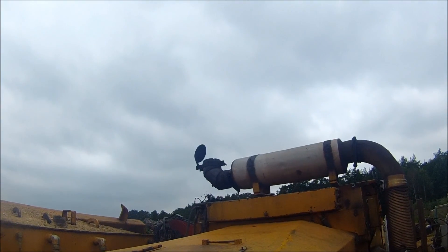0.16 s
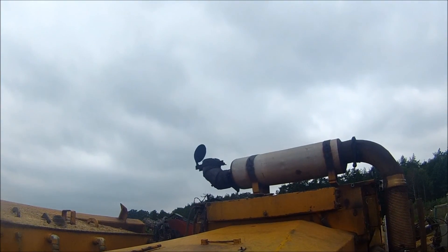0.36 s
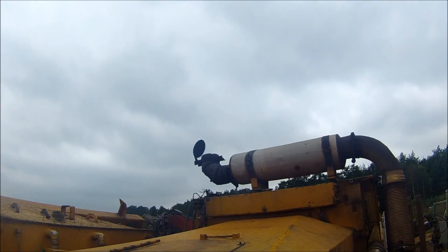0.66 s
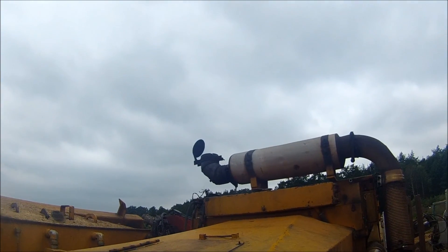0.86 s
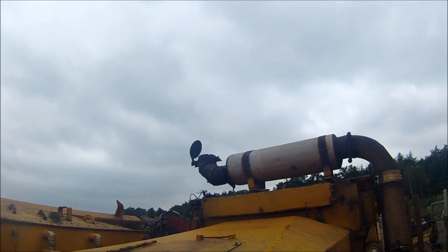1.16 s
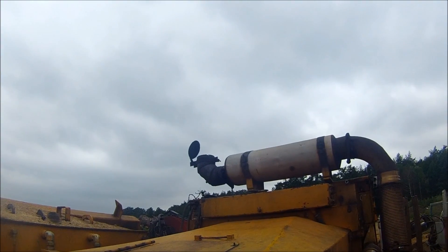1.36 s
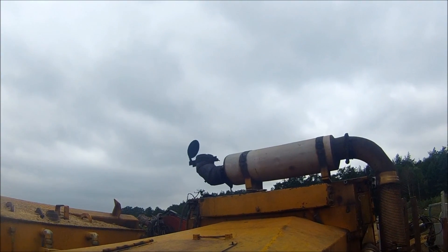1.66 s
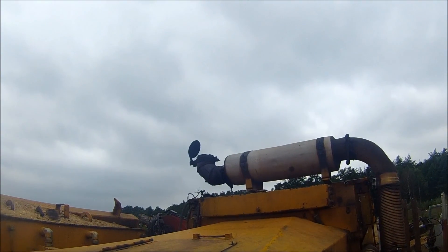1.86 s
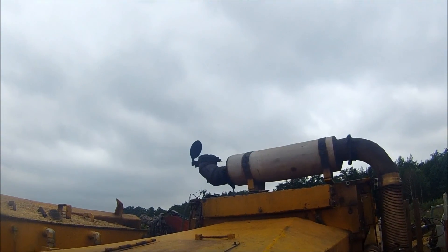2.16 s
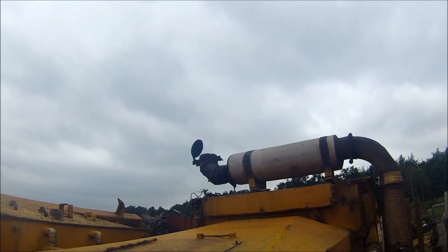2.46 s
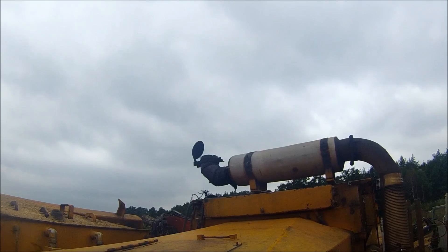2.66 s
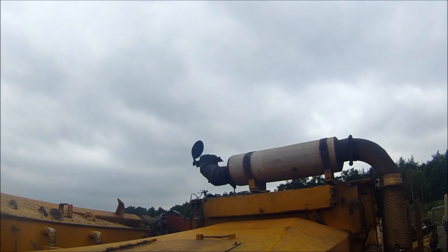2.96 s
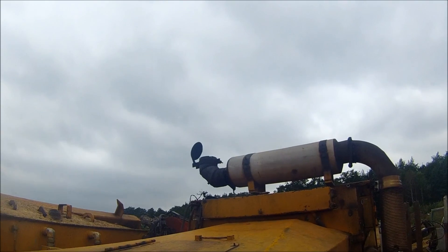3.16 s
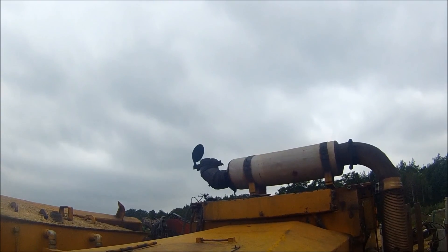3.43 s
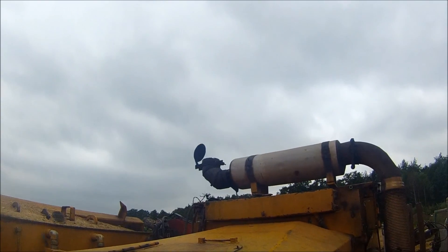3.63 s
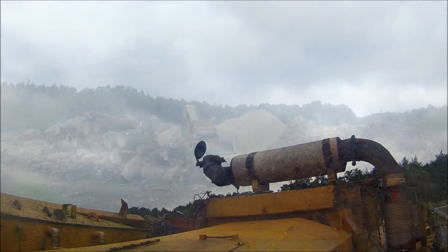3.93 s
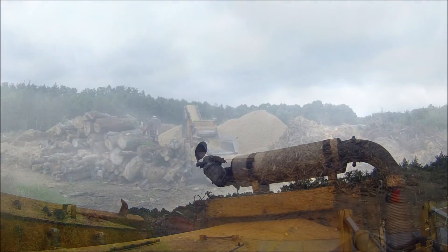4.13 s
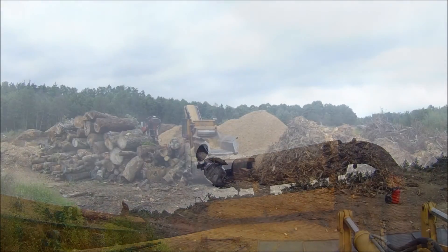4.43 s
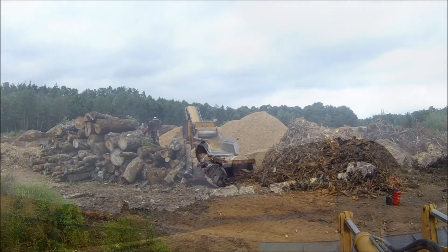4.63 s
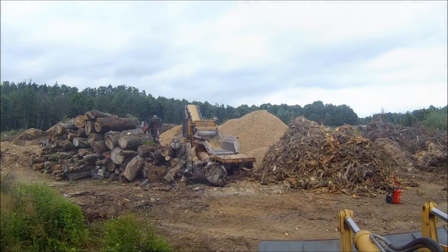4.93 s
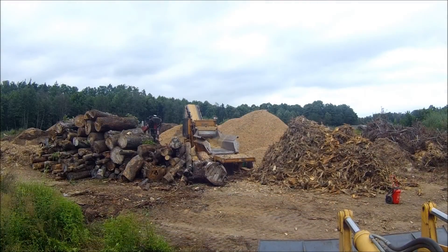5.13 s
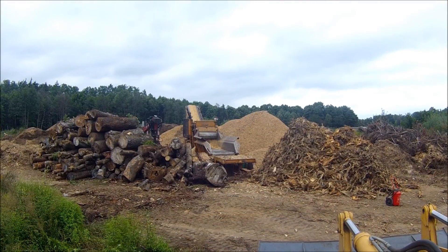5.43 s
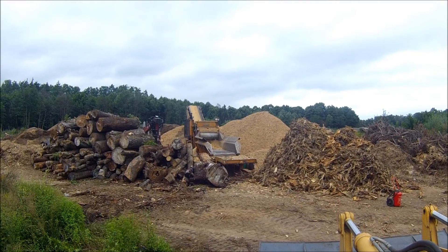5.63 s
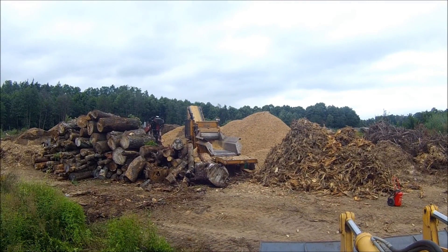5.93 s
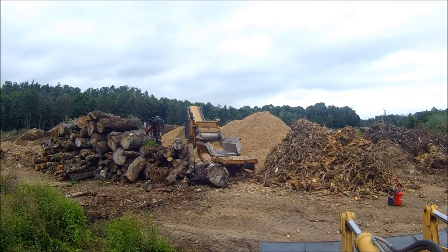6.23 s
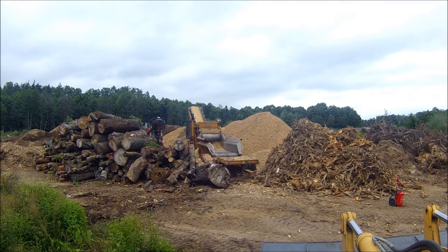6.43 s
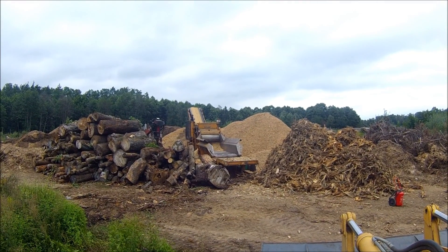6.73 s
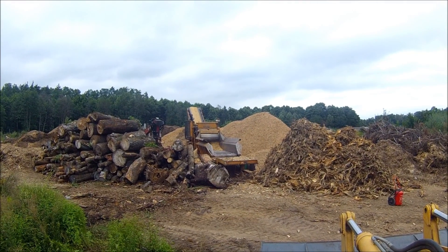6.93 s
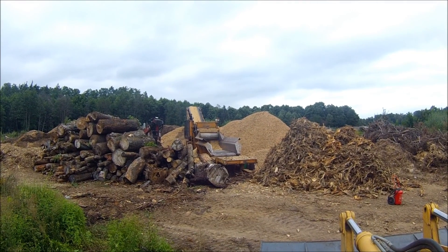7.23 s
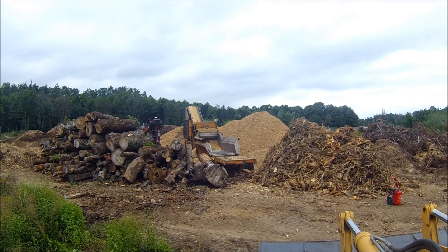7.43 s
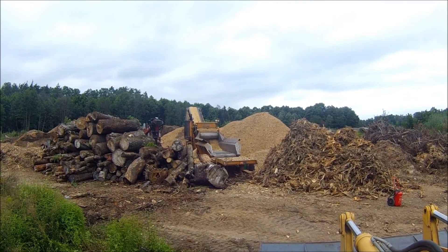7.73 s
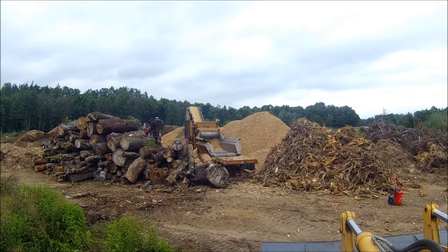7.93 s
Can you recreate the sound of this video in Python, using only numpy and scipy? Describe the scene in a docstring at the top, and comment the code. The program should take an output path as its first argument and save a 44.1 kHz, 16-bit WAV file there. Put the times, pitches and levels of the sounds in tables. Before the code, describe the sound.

Close engine roar with thin high turbo whine gives way at a click to a quieter distant grinder that bogs down, rattling and knocking through wood.

```python
"""A big diesel wood grinder heard first from its own deck, then from across the yard; the two overlap for a while.
On deck: sines on the engine orders, a wide roar of filtered noise and a turbocharger whine of gliding pitch,
all dropping suddenly now and then and creeping back. From afar: the firing hum sags under load, chips rush and
the rotor knocks on a log. Both microphones sit in sealed cases whose resonances colour the roar and chips."""
import sys
import numpy as np
from scipy import signal
from scipy.fft import rfft, irfft
from scipy.io import wavfile

SR = 44100
rng = np.random.default_rng(int(sys.argv[2]) if len(sys.argv) > 2 else 0)


def volts(x):
    """Linear amplitude factor 10**(x/20) for a level x in dB, scalar or array-like."""
    e = np.asarray(x, float) / 20
    return 10 ** e


def unload_wav(signal):
    """Save mono or channel-first audio to the path in sys.argv[1] as 16-bit WAV at rate SR, clipped to [-1, 1]."""
    wavfile.write(
        sys.argv[1],
        SR,
        np.round(np.clip(np.atleast_2d(signal).T, -1, 1) * 32767).astype(np.int16),
    )


N = 356769  # length [samples]
TIME = np.arange(N) / SR  # [s]


def evened(x):
    """Normalisation: scales to rms 1."""
    return x / np.sqrt(np.mean(x ** 2) + 1e-20)


def curves(rows):
    """Linear interpolation: each column of a timed table, sample by sample."""
    s, *columns = np.transpose(rows)
    return [np.interp(TIME, s, column) for column in columns]


def drift(cutoff_hz, size=64):
    """Low-passed noise: a slow random course of rms 1, drawn coarsely and joined by lines."""
    lowpass = signal.butter(2, cutoff_hz, fs=SR / size, output="sos")
    slow = signal.sosfilt(lowpass, rng.standard_normal(N // size + 2))
    return np.interp(np.arange(N) / size, np.arange(len(slow)), evened(slow))


def ramp_up(end_s, length_s):
    """Linear fade: rises from 0 to 1, ending at end_s."""
    return np.clip((TIME - end_s) / length_s + 1, 0, 1)


def colour(modes, body=None, size=8192):
    """Minimum-phase response whose power is a sum of steep resonances over a smooth body."""
    hz = np.fft.rfftfreq(size, 1 / SR)
    power = sum(volts(db) ** 2 / (1 + ((hz - f) / width) ** 2) ** 2 for f, width, db in modes)
    if body:
        f, db = np.transpose(body)
        power = power + volts(np.interp(np.log(hz + 1), np.log(f + 1), db)) ** 2
    # folding the cepstrum onto positive time makes the response causal
    cepstrum = irfft(np.log(power + 1e-10) / 2)
    cepstrum[1:size // 2] *= 2
    cepstrum[size // 2 + 1:] = 0
    response = irfft(np.exp(rfft(cepstrum)))
    return evened(response) / np.sqrt(size)  # unit energy: white noise keeps its rms


def through(x, response):
    """Convolution of a sound with a response."""
    return signal.oaconvolve(x, response)[:N]


def orders(turns, table, waver_db):
    """Harmonic synthesis: sines on multiples of the engine cycle, each wavering on its own."""
    total = np.zeros(N)
    for multiple, db in table:
        gain = volts(db + waver_db * drift(2.6))
        total += gain * np.sqrt(2) * np.sin(2 * np.pi * (multiple * turns + rng.random()))
    return total


def turbulence(turns, throb, flicker_db, chips_per_s, chips_db):
    """Modulated noise: air that throbs once a crank turn and flickers, with the ticks of flying chips."""
    beat = 1 + throb * np.cos(2 * np.pi * 2 * turns)  # two crank turns per engine cycle
    air = rng.standard_normal(N) * beat * volts(flicker_db * drift(49))
    ticks = (rng.random(N) < chips_per_s / SR) * rng.standard_normal(N) * volts(chips_db)
    return evened(air + ticks)


# Deck engine orders; fractions come from the rotor: (multiple of the engine cycle, level [dB])
NEAR_ORDERS = [(.62, -50), (2, -47), (2.5, -52), (3, -43), (4, -45), (5, -50), (6, -44), (7, -56), (8, -43),
               (9, -43), (10, -41), (11, -55), (12, -49), (13, -46), (14, -42), (15, -44), (16, -49),
               (17, -54), (19, -54), (21, -54), (24, -57), (36, -53), (39, -54), (48, -51), (72, -50)]


def near_engine(turns):
    """Periodic forces sound at multiples of the engine cycle."""
    return orders(turns, NEAR_ORDERS, waver_db=1.5)


# Smooth spectrum of the deck roar: (frequency [Hz], relative level per Hz [dB])
NEAR_BODY = [(15, -17), (60, -21), (220, -9.5), (330, -18.5), (560, -17), (950, -17), (1600, -52),
             (1850, -85), (3200, -24), (5200, -23), (7000, -42), (11000, -38.5), (15500, -44.5)]
# Resonances of the deck microphone's case: (centre [Hz], width [Hz], relative level per Hz [dB])
NEAR_CASE = [(626, 18, -22), (754, 28, -15), (907.5, 23, -10), (1056, 88, -11.5), (1146, 63, -7.5),
             (1424, 120, -8), (1451, 29, -5.5), (2199, 91, -2), (2463, 181, -0.5), (2936, 310, -10.5),
             (3860, 450, -8), (4047, 100, -3), (4547, 342, -5), (6020, 130, -25), (6550, 64, -21),
             (6740, 260, -26.5), (7980, 440, -24.5), (9350, 350, -33), (10200, 260, -37)]


def near_roar(turns):
    """Turbulent noise shaped by the case resonances."""
    air = turbulence(turns, throb=.09, flicker_db=.7, chips_per_s=200, chips_db=10)
    return through(air * volts(-17), colour(NEAR_CASE, NEAR_BODY))


# Turbocharger whine, mean level: (time [s], level [dB])
WHINE = [(0, -44), (.5, -38), (.85, -46), (2.25, -45.5), (2.75, -39.5), (3.05, -45.5), (3.5, -44.5),
         (4.25, -39.5), (4.75, -41.5), (5.05, -38.5)]
# Turbocharger whine, mean pitch: (time [s], frequency [Hz])
WHINE_HZ = [(0, 7965), (1.2, 7952), (1.75, 7930), (2.2, 7952), (3, 7965), (3.6, 7945), (3.7, 7910),
            (5.1, 7893)]


def turbocharger_whine(turns):
    """Frequency and amplitude modulation: pitch and level swing oppositely once per engine cycle."""
    swing = np.cos(2 * np.pi * (turns + .34))
    hz = curves(WHINE_HZ)[0] + 45 * swing + 5 * drift(100)
    db = curves(WHINE)[0] - 4 * swing + 1.8 * drift(30)
    return volts(db) * np.sqrt(2) * np.sin(2 * np.pi * np.cumsum(hz) / SR)


# Sudden drops of the deck sound: (time [s], depth [dB])
DIPS = [(0.268, 3.5), (.8274, 1.5), (.9925, 2.5), (1.1323, 3), (1.5694, 2), (1.7519, 1.5), (1.86, 2.5),
        (2.0504, 3), (2.41, 3), (2.655, 1.5), (2.923, 2), (3.1759, 2.5), (3.43, 1), (3.4928, 2),
        (3.6457, 2), (4.0017, 2), (4.33, 2), (4.4096, 3), (4.6921, 2.5), (4.9369, 1.5)]


def dips():
    """Gain modulation: the level falls at once at each dip and climbs back steadily."""
    creep_db_per_s = 12.5
    depths = [(TIME >= s) * np.maximum(db - creep_db_per_s * (TIME - s), 0) for s, db in DIPS]
    return volts(-np.max(depths, axis=0))


# Engine speed heard on deck: (time [s], speed [engine cycles per s])
NEAR_SPEED = [(0, 16.25), (.7, 16.38), (1.5, 16.14), (1.9, 15.81), (2.3, 15.8), (3.1, 16.07), (3.5, 15.92),
              (3.9, 15.5), (4.3, 15.55), (5.1, 15.35)]


def on_deck():
    """Superposition of engine, roar and whine, locked to one engine phase."""
    turns = np.cumsum(curves(NEAR_SPEED)[0]) / SR
    mix = near_roar(turns) + turbocharger_whine(turns) + near_engine(turns)
    return dips() * mix * (1 - ramp_up(5.116, .016))


def firing_hum(turns, speed):
    """Sixth-order forcing: the hum grows as load drags the speed down; it starts strong and settles."""
    free_db, load_gain_db = -37, 5.5
    free_speed, lug_speed = 16.9, 14  # without load and at full load [engine cycles per s]
    surge_db, surge_s = 5, .4
    since = np.maximum(TIME - FAR_SPEED[0][0], 0)
    lug = (free_speed - speed) / (free_speed - lug_speed)
    db = free_db + load_gain_db * lug + surge_db * np.exp(-since / surge_s)
    return volts(db) * orders(turns, [(6, 0)], waver_db=.6)


# Other orders from afar; fractions come from the rotor:
# (multiple of the engine cycle, level running free [dB], level under load [dB])
FAR_ORDERS = [(.62, -47, -49), (2, -46, -46), (3, -56, -43), (4, -45, -53), (5, -54, -49), (7, -52, -60),
              (7.5, -49, -62), (8, -56, -54), (9, -62, -53), (10, -51, -60), (11, -55, -62), (12, -48, -54),
              (14, -49, -60), (15, -52, -57), (16, -56, -57), (18, -59, -58), (19, -56, -57),
              (20, -54, -55), (21, -59, -57), (22, -56, -58), (23, -53, -58), (24, -53, -57),
              (25, -55, -53), (26, -57, -60)]


def far_engine(turns, speed):
    """Load-dependent harmonics: each level moves between its free and loaded value."""
    load = np.clip((16.2 - speed) / 1.6, 0, 1)
    table = [(multiple, free + load * (loaded - free)) for multiple, free, loaded in FAR_ORDERS]
    return orders(turns, table, waver_db=1.5)


# Noise from across the yard: (time [s], engine roar level [dB], chip rush level [dB])
FAR_ROAR = [(5.15, -34.5, -33), (5.23, -33.5, -35), (5.3, -35, -37.5), (5.43, -31.5, -32),
            (5.8, -31.5, -30), (6.15, -33, -33), (6.65, -33, -32.5), (7.13, -36, -38), (7.7, -34.5, -35.5),
            (8.09, -34, -34)]
# Smooth spectrum of the far roar: (frequency [Hz], relative level per Hz [dB])
FAR_BODY = [(15, 0.5), (70, -7.5), (150, -13.5), (380, -10.5), (520, -17), (800, -21), (1250, -16),
            (1700, -37), (2000, -24), (3300, -28.5), (3800, -16.5), (5200, -38), (7000, -43), (9000, -39)]
# Resonances of the far microphone's case: (centre [Hz], width [Hz], relative level per Hz [dB])
FAR_CASE = [(1115, 104, -14), (1440, 90, -6.5), (2215, 100, -5), (2422, 77, -6), (2623, 127, -7),
            (2995, 70, -11)]


def far_roar(turns):
    """Turbulent noise, dulled by its falling spectrum and coloured by the case resonances."""
    air = turbulence(turns, throb=0.033, flicker_db=0.47, chips_per_s=110, chips_db=7)
    return through(air * volts(curves(FAR_ROAR)[0]), colour(FAR_CASE, FAR_BODY))


# The same case rung by chips and knocks: (centre [Hz], width [Hz], relative level per Hz [dB])
CUTTING = [(4080, 100, 1.5), (4460, 200, 7.5), (4710, 300, -20), (5240, 210, -10), (5960, 150, -17.5),
           (6640, 330, -20), (7600, 150, -34), (8080, 500, -22.5)]


def chip_rush(turns):
    """Random impacts: noise and dense ticks of chips excite the high case resonances."""
    rush = turbulence(turns, throb=0.035, flicker_db=0.5, chips_per_s=110, chips_db=16)
    return through(rush * volts(curves(FAR_ROAR)[1]), colour(CUTTING))


def microphone_hiss():
    """White noise: the far microphone's own."""
    return volts(-51) * rng.standard_normal(N)


# Engine speed heard across the yard: (time [s], speed [engine cycles per s])
FAR_SPEED = [(3.7, 15.3), (4.4, 16.3), (4.7, 16.7), (5.05, 16.9), (5.35, 16.85), (5.65, 16.26),
             (6.25, 14.95), (6.85, 13.98), (7.15, 14.35), (7.75, 16.07), (8.09, 16.9)]


def across_the_yard():
    """Superposition of hum, orders, roar, chips, hiss, knocks and scrape, faded in together."""
    speed = curves(FAR_SPEED)[0]
    turns = np.cumsum(speed) / SR
    hum = firing_hum(turns, speed) + far_engine(turns, speed)
    noise = far_roar(turns) + chip_rush(turns) + microphone_hiss()
    return (hum + noise + knocks() + scrape()) * ramp_up(FAR_SPEED[0][0] + 0.035, .03)


def switch_off():
    """Transients: a slow push on the deck microphone's case and a bright click as it stops."""
    release_s, click_s = 5.1145, 5.104
    rise = np.exp(np.minimum(TIME - release_s, 0) / 0.018)
    push = -.24 * rise * np.exp(-(np.maximum(TIME - release_s, 0) / 0.0019) ** 2)
    bright = np.diff(rng.standard_normal(N + 1))  # differencing tilts white noise to the treble
    click = bright * np.exp(-((TIME - click_s) / 0.00084) ** 2)
    return push + volts(-24) * click


# Rotor teeth hitting the log: (time [s], peak level of the blow [dB], crackle peak relative to it [dB])
KNOCKS = [(5.3802, -25, -18), (5.47, -25, -18), (5.585, -23, -18), (5.686, -15, -19), (5.7834, -19, -18),
          (5.885, -18, -18), (5.9867, -12, -19), (6.0911, -26, -14), (6.1964, -14, -19),
          (6.3025, -13.5, -18), (6.4098, -8, -22), (6.5189, -11.5, -19), (6.6286, -12.5, -19),
          (6.7402, -14, -13), (6.8532, -20, -14), (6.9682, -22, -8), (7.3138, -21, -24)]


def knocks():
    """Impulse excitation: a blow, crackle and splinter spray ring the case; glancing ones are brighter."""
    out = np.zeros(N)
    t = np.arange(2600) / SR
    low = colour(CUTTING[:3])[:len(t)] * np.minimum(t / .001, 1)  # rises over 1 ms
    high = colour(CUTTING[3:])
    for s, db, bright_db in KNOCKS:
        blow = rng.standard_normal(len(t)) * (volts(-33) * np.exp(-t / .02) + volts(-25) * np.exp(-t / .001))
        blow[0] = 1  # the blow itself, followed by the spray
        crackle = rng.standard_normal(len(t)) * np.exp(-t / .004)
        ring = signal.fftconvolve(blow, low)[:len(t)]
        fizz = signal.fftconvolve(crackle, high)[:len(t)]
        knock = ring / abs(ring).max() + volts(bright_db) * fizz / abs(fizz).max()
        out[round(s * SR):][:len(t)] += volts(db) * knock
    return out


def scrape():
    """Friction noise: a brief swell in the case's middle resonances."""
    swell = np.exp(-((TIME - 7.71) / .05) ** 2)
    return through(volts(-34) * swell * rng.standard_normal(N), colour(FAR_CASE[3:5]))


def scene():
    """Superposition: the far sound joins, then the deck sound stops."""
    return (on_deck() + switch_off() + across_the_yard())[None]


def roll_off(x):
    """The treble ends steeply here."""
    return signal.sosfilt(signal.butter(12, 15560, fs=SR, output="sos"), x)


def record(dry):
    """Band limitation: a linear-phase low-pass at 15250 Hz ends the treble."""
    edge = signal.firwin(511, 15250, window=("kaiser", 9), fs=SR)
    mix = signal.oaconvolve(dry, edge[None], "same")
    return roll_off(mix)


dry = scene()
out = record(dry)
unload_wav(out)
```